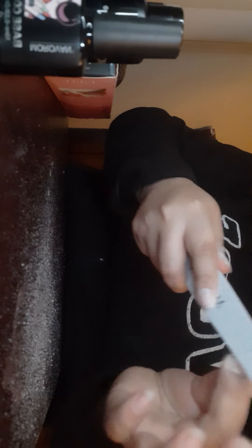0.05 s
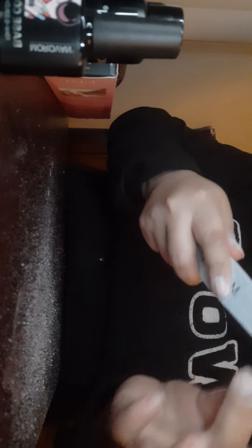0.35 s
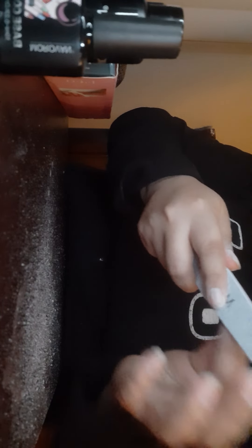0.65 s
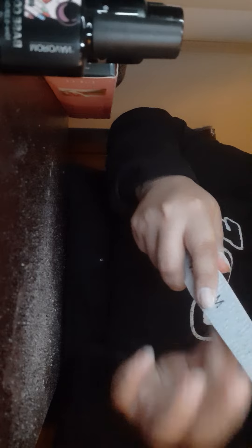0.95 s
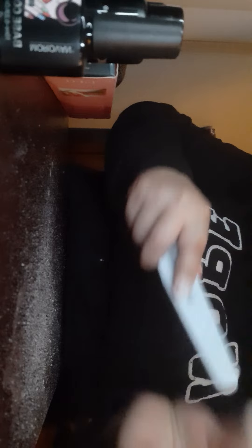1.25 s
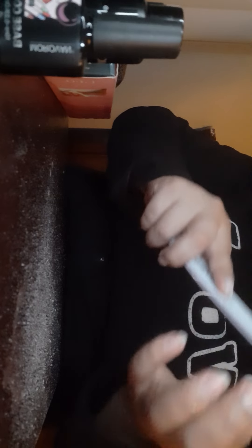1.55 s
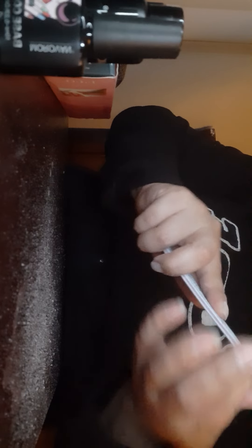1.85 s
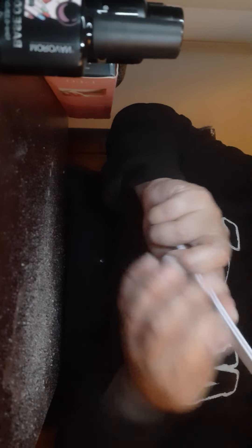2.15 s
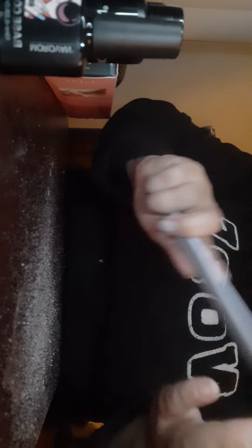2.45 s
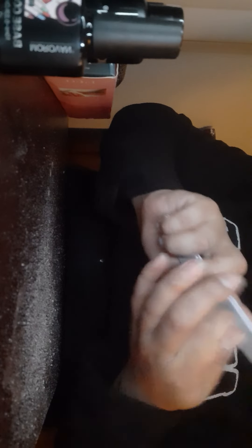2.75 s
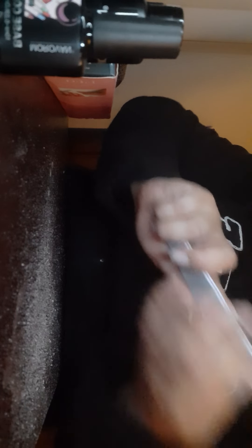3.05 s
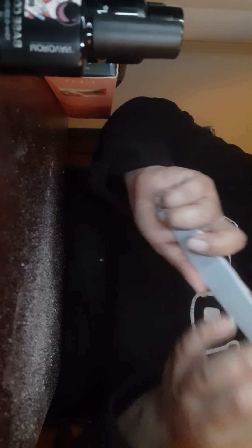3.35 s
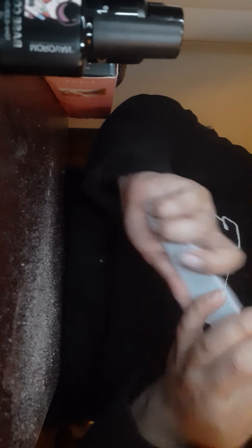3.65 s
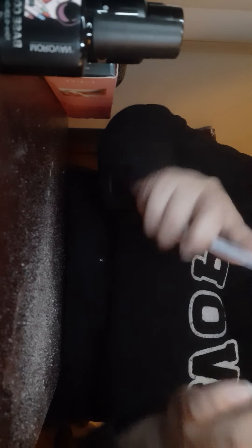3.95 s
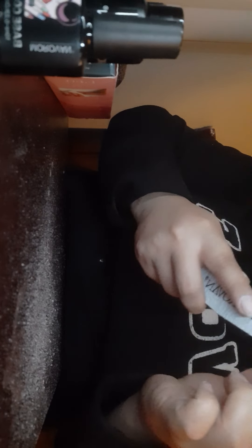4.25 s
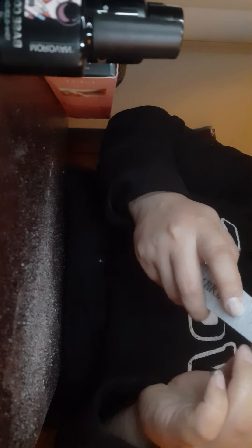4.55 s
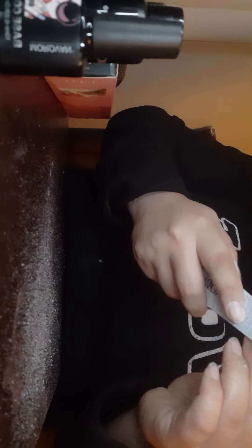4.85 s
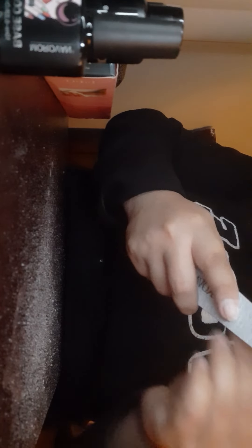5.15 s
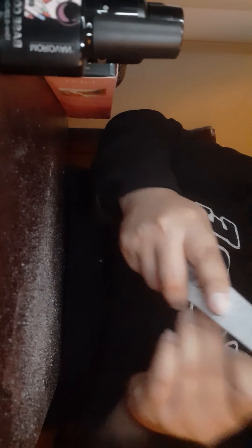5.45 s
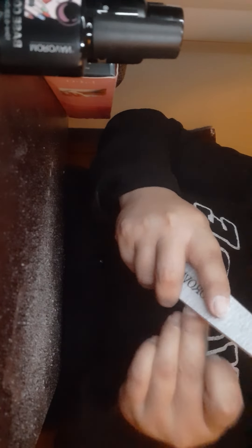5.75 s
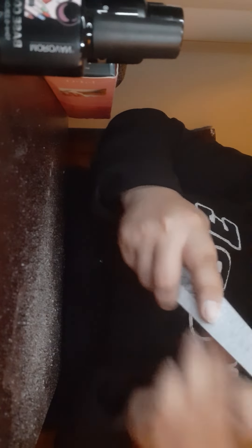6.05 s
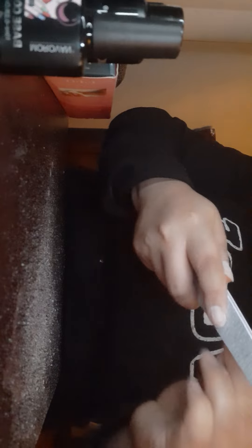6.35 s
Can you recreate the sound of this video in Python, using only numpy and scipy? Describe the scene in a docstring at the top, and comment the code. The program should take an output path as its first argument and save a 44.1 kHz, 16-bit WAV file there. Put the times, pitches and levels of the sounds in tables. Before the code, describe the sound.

Close, gritty rasping of a nail file comes in quick bursts with light ticks and brief pauses, over a low electrical hum.

```python
"""An emery board files fingernails back and forth in short runs, close to a phone in a small room.
Grit catches on the nail's edge thousands of times a second: grains hiss, the nail rasps, the board
rattles. The board ticks and knocks as it meets a nail, and twice a faint tone rings on after a run.
In the pauses come faint squeaks, rustling sleeves and one soft, low bump.
Mains hum, a low drone and steady room noise lie under it all."""
import sys
import numpy as np
from scipy import signal
from scipy.fft import rfft, irfft, next_fast_len
from scipy.io import wavfile
from scipy.ndimage import uniform_filter1d

SR = 44100
rng = np.random.default_rng(int(sys.argv[2]) if len(sys.argv) > 2 else 0)


def wrap_up_sound(samples):
    """Save the sound to the file named by the first command line argument, as 16-bit audio."""
    columns = np.atleast_2d(samples).T
    # keep every value between -1 and 1, then stretch to whole-number steps
    tamed = np.clip(columns, -1, 1)
    steps = np.round(tamed * 32767).astype(np.int16)
    wavfile.write(sys.argv[1], SR, steps)


N = 291501
T = np.arange(N) / SR

# Each pass of the board. Direction is 1 out towards the nail's tip and -1 back.
# start_s, end_s, direction, force_db, board_gain_db
PASSES = [ (0.0, 0.11, 1, -45.5, -12.5), (0.108, 0.145, -1, -42, -12), (0.137, 0.207, 1, -45, -2),
          (0.208, 0.236, -1, -54.5, -14), (.594, 0.761, 1, -60.5, -12), (.753, 0.835, 1, -49.5, -9.5),
          (.833, 0.949, -1, -53.5, -10.5), (0.968, 1.07, 1, -49, -11), (1.06, 1.147, -1, -46, -12.5),
          (1.16, 1.284, 1, -42.5, -13), (1.637, 1.801, 1, -48.5, -16.5), (1.796, 1.878, -1, -47.5, -11),
          (1.895, 2.035, 1, -45, -15), (2.027, 2.119, -1, -48.5, -12.5), (2.123, 2.259, -1, -46.5, -10.5),
          (2.267, 2.425, 1, -41, -10), (2.699, 2.814, -1, -45, -12.5), (2.817, 2.921, 1, -47.5, -11),
          (2.925, 3.029, -1, -42.5, -12.5), (3.031, 3.175, 1, -40.5, -9.5), (3.465, 3.561, -1, -43, -13),
          (3.565, 3.692, 1, -47.5, -7.5), (3.658, 3.77, 1, -46, -10), (4.926, 5.02, 1, -54, -12.5),
          (5.057, 5.173, -1, -53.5, -14), (5.17, 5.284, 1, -50.5, -7.5), (5.302, 5.398, -1, -52.5, -7),
          (5.411, 5.517, 1, -51, -3.5), (5.545, 5.662, -1, -50, -8), (5.668, 5.778, 1, -48.5, -7),
          (5.793, 5.917, -1, -47.5, -9), (5.913, 6.029, 1, -48, -10.5), (6.037, 6.153, -1, -47.5, -9),
          (6.146, 6.267, 1, -51, -7), (6.273, 6.374, -1, -55.5, -5.5), (6.383, 6.504, 1, -53, -5),
          (6.504, 6.605, -1, -50.5, -7.5)]
# How the board is held, until the next grip. The drop and the rise apply only to outward passes.
# start_s, ring_hz, ring_drop_hz, rasp_gain_db, board_rise_db, left_over_right_db
GRIPS = [(0, 2780, 500, -5.5, 0, 5), (.5, 2540, 520, -6, 5.5, 7.5), (1.5, 2550, 350, -8.5, 7, 5),
         (2.08, 2500, 70, -5.5, 20, 1.2), (2.6, 2480, 87, -7, 16, 3), (3.3, 2700, 0, -7.5, 11, 4),
         (4.8, 1980, 52, -5, 27, 5.5), (5.85, 1940, 0, -6, 11.5, 6)]
# The hand bears down for a moment: time_s, extra_db
PRESSES = [(1.235, 4), (2.345, 0.5), (3.048, 5), (3.73, 0.5), (5.485, 1), (5.737, 2)]
# The board meets, snags on or slips off a nail: time_s, tick_gain_db, knock_gain_db
TAPS = [(0.127, -28.5, -70), (1.262, -34.5, -61), (1.643, -69, -53), (2.35, -51, -32), (2.4, -35.5, -60),
        (2.705, -65, -40), (3.147, -37, -40), (3.467, -49, -41), (4.895, -67, -46.5)]
# A faint tone rings on after a run of passes: start_s, level_db
AFTER_RINGS = [(.2, -72.5), (2.47, -86)]
# Faint, high squeaks: start_s, end_s, pitch_hz, level_db
SQUEAKS = [(3.358, 3.445, 6500, -82), (3.833, 3.963, 3300, -75), (4.325, 4.427, 4300, -77)]
# Sleeves and fingers shift: start_s, end_s, level_db
RUSTLES = [(4.327, 4.483, -75), (4.497, 4.62, -73.5), (4.653, 4.754, -68)]
# The tones in the hum: multiple_of_mains, left_db, right_db
HUM_TONES = [(2, -51, -59), (3, -66.5, -67.5), (4, -72.5, -102), (5, -66.5, -77.5), (6, -64.5, -104.5),
             (8, -77.5, -111), (10, -78.5, -92.5)]
# How the low drone swells and sinks: time_s, level_db
DRONE_LEVELS = [(0, -68), (1.1, -70), (1.26, -62), (1.45, -73), (2.1, -62.5), (3.5, -67), (4.25, -77.5),
                (5.7, -77), (6.1, -67), (6.6, -72)]

# Tone curves, which say how strong each sound is from low to high: frequency_hz, gain_db
GRIT_TONE = [(5000, -97), (8700, -12), (10000, -4.5), (11300, 4.5), (13000, 6.5), (14500, 8.5), (16000, -5)]
NAIL_TONE = [(2000, -25.5), (3600, -10.5), (4300, -6), (4650, -3.5), (4950, 0), (5200, 0), (5550, -5),
             (6300, -4.5), (7200, 2), (7850, -4), (8600, -17), (11000, -20)]
BOARD_TONE = [(150, -11.5), (400, -5.5), (620, -2.5), (800, -13), (1120, -3), (1300, -3.5), (1490, 2.5),
              (1780, -7), (2100, -3), (2700, -4.5), (3400, -6), (4500, -10.5), (8000, -35.5)]
KNOCK_TONE = [(60, -18), (170, 12.5), (400, 8), (800, -9), (2200, -5), (4000, -36), (12000, -34)]
CLOTH_TONE = [(200, 27), (700, -23), (1500, 16.5), (3000, -21), (4600, 10), (8600, -14), (12000, 14),
              (13500, 18), (15500, 7)]
RUMBLE_TONE = [(25, -17), (55, -3.5), (100, -8.0), (200, -11.5), (400, -14), (800, -38), (3000, -61)]
DRONE_TONE = [(20, -29.5), (45, -25), (60, 0.5), (68, 3), (76, -3), (95, -8.5), (160, -14.5), (350, -43.5),
              (700, -36.5), (2000, -91)]
AIR_TONE = [(20, -33), (48, -12.5), (68, -6.5), (90, -4), (170, 0.5), (260, -7.5), (450, -13.5), (800, -26),
            (2000, -32.5), (5000, -37), (8600, -46), (13500, -31.5), (16000, -32)]
# How much more the left microphone hears than the right: frequency_hz, left_over_right_db
HANDS_BALANCE = [(100, -17), (400, 10), (1100, 11.5), (1500, 5.5), (2200, 6.5), (3300, 0), (5200, -0.5),
                 (6500, -6.5), (9000, -4.5), (12000, -5), (15000, -3)]
AIR_BALANCE = [(60, 11), (200, 22), (380, 7.5), (700, 4.1), (1300, 4), (2400, 1.4), (15000, 2)]


def filing(rise_db=3.5, lean_in_db=9.5, pause_s=.15, press_width_s=0.021):
    """All the passes. Going out, the nail nears the tip: the board shakes more and mostly rings lower."""
    out, last_end = np.zeros((2, N)), -np.inf
    for start, end, direction, force_db, board_db in PASSES:
        grip = GRIPS[sum(start >= later[0] for later in GRIPS[1:])]
        _, ring_hz, drop_hz, rasp_db, growth_db, left_db = grip
        # pressure rises over every pass, and more after a pause, as the hand leans in
        press_db = lean_in_db if start - last_end > pause_s else rise_db
        board_rise_db, ring_hz = (growth_db, ring_hz - drop_hz) if direction > 0 else (0, ring_hz)
        # shaking the board more than the usual -8.5 dB also rasps the nail more
        nail_db = rasp_db + 0.28 * (board_db + 8.5)
        sound = one_pass(end - start, force_db, press_db, nail_db, board_db, board_rise_db, ring_hz)
        add(out, start, sound * undb([[left_db / 2], [-left_db / 2]]))
        last_end = end
    extra_db = sum(db * np.exp(-((T - time) / press_width_s) ** 2) for time, db in PRESSES)
    return out * undb(extra_db)


def one_pass(length_s, force_db, press_db, nail_db, board_db, board_rise_db, ring_hz, size=12000):
    """The grit bites quickly and lets go slowly, shaking the grains, the nail and the board."""
    age = T[:size]
    progress, speed = hand_move(age, length_s)
    bite_and_release = speed ** np.where(progress < 0, 0.34, 1.5)
    force = bite_and_release * undb(force_db + press_db * progress)
    # after each turn the board skims for a moment before the grit catches
    force *= np.where(age < 0.0052, undb(-9), 1)
    # it sticks and slips, so the force comes in uneven bunches
    force *= flicker(depth_db=1.04, rate_hz=216.7, size=size)
    grit = grit_clicks(speed)
    # the hiss needs speed, so it dies sooner at the turns than the board's rattle
    hiss = ring_body(1.06 * force * speed ** 0.21, speed, grit, GRIT_TONE, beamed=0.94)
    rasp = ring_body(force, speed, grit, NAIL_TONE, beamed=0.63)
    shake = force / (speed + 0.037) ** .18 * undb(board_rise_db * progress)
    shake *= flicker(depth_db=0.5, rate_hz=146.0, size=size)
    rattle = ring_body(shake, speed, grit, BOARD_TONE, beamed=0.23)
    # the free end of the board adds a ring whose pitch depends on the grip
    rattle += 0.96 * signal.lfilter(*signal.iirpeak(ring_hz, Q=9, fs=SR), rattle)
    return hiss + undb(nail_db) * rasp + 0.6 * undb(board_db) * rattle


def grit_clicks(speed, peak_per_s=18000, spread_db=4.0):
    """Grit snaps past the nail's edge in single clicks; a faster hand catches more of them."""
    count = len(speed)
    chance = np.clip(peak_per_s / SR * (.3 + .7 * speed), .01, 1)
    caught = rng.random(count) < chance
    sizes = rng.choice([-1, 1], count) * undb(spread_db * rng.standard_normal(count))
    return unit(caught * sizes / np.sqrt(chance))


def ring_body(force, speed, grit, tone, beamed):
    """Clicks make a body ring. The beamed share of the sound reaches just one microphone or the other."""
    def heard(clicks):
        return bounces(colour(force * clicks, tone), bounce_db=-3)

    shared = heard(grit)
    separate = np.array([heard(grit_clicks(speed))[side] for side in range(2)])
    return np.sqrt(1 - beamed) * shared + np.sqrt(beamed) * separate


def taps(tick_fade_s=0.0016):
    """Each tap is a brief crunch of grit on the nail and a dull push into the board and finger."""
    fades, pushes = np.zeros((2, N))
    for start, tick_db, knock_db in TAPS:
        first = int(start * SR)
        fades[first:] += undb(tick_db) * np.exp(-T[:N - first] / tick_fade_s)
        pushes[first] += undb(knock_db)
    crunch = fades * rng.standard_normal(N)
    ticks = colour(crunch, GRIT_TONE) + .5 * colour(crunch, NAIL_TONE)
    knocks = undb(11) * colour(pushes, KNOCK_TONE)
    return bounces(ticks, bounce_db=11) + knocks


def after_ring(pitch_hz=1106, waver_hz=21.8, fade_s=0.8):
    """One faint, wavering tone dies away when the board lifts."""
    level = sum(undb(db) * (T > start) * die_away(T - start, fade_s) for start, db in AFTER_RINGS)
    cycles = np.cumsum(pitch_hz + waver_hz * wander(rate_hz=60)) / SR
    return level * sine(cycles)


def squeaks():
    """Brief, airy squeaks swell and fade, each a narrow band of noise."""
    out = np.zeros(N)
    for start, end, pitch_hz, db in SQUEAKS:
        band = signal.iirpeak(pitch_hz, Q=6, fs=SR)
        whistle = unit(signal.lfilter(*band, signal.lfilter(*band, rng.standard_normal(N))))
        _, swell = hand_move(T - start, end - start)
        out += undb(db) * swell * whistle
    return bounces(out, bounce_db=-5)


def sleeves():
    """Cloth and skin brush unevenly as the hands change grip."""
    rub = np.zeros(N)
    for start, end, db in RUSTLES:
        _, speed = hand_move(T - start, end - start)
        rub += undb(db) * np.sqrt(speed)
    rub *= flicker(depth_db=3.0, rate_hz=150)
    return np.array([colour(rub * rng.standard_normal(N), CLOTH_TONE) for _ in range(2)])


def bump(start_s=4.352, level_db=-36, rise_s=0.078, fade_s=0.46, pitch_hz=68.5, right_db=-5):
    """A soft shove swells one deep note, with a little rumble around it."""
    age = T - start_s
    swell = np.sqrt(np.clip(age / rise_s, 0, 1)) * die_away(age - rise_s, fade_s)
    rumble = undb(-16) * colour(rng.standard_normal(N), RUMBLE_TONE)
    return undb(level_db) * swell * (sine(pitch_hz * T) + rumble) * undb([[0], [right_db]])


def bounces(sound, bounce_db, fade_s=.0022):
    """Sound reaches two microphones directly, right first, and also bounces off the hands and desk."""
    age = T[:1024]
    pair = []
    for delay_samples in (3, 0):
        echoes = rng.standard_normal(len(age)) * np.exp(-age / fade_s) * (age > .0005)
        response = undb(bounce_db) * echoes / np.linalg.norm(echoes)
        response[delay_samples] += 1
        pair.append(convolve(sound, response / np.linalg.norm(response)))
    return np.array(pair)


def room(pair, echo_db=-10.0, fade_s=0.24):
    """The room adds a short echo; the board's lower tones reach mostly the left microphone."""
    age = T[:SR // 2]
    tails = rng.standard_normal((2, len(age))) * die_away(age, fade_s) * (age > .005)
    echo = np.array([convolve(side, tail / np.linalg.norm(tail)) for side, tail in zip(pair, tails)])
    return balance(pair + undb(echo_db) * echo, HANDS_BALANCE)


def mains_hum(mains_hz=59.97, waver_db=1.0, right_lead_s=0.0011):
    """An appliance hums at multiples of the mains rate; the room's waves reach the right side first."""
    out = np.zeros((2, N))
    clock = np.array([T, T + right_lead_s])
    for multiple, left_db, right_db in HUM_TONES:
        tone = sine(multiple * mains_hz * clock + rng.random())
        out += undb([[left_db], [right_db]]) * tone * undb(waver_db * wander(rate_hz=2.007))
    return out


def room_noise(air_db=-65, split_hz=600):
    """Steady air noise and a low drone. Both microphones share the bass; each has its own hiss."""
    low, high = (signal.butter(2, split_hz, kind, fs=SR, output="sos") for kind in ("low", "high"))
    bass = signal.sosfilt(low, rng.standard_normal(N))
    hiss = signal.sosfilt(high, rng.standard_normal((2, N)))
    air = undb(air_db) * np.array([colour(bass + side, AIR_TONE) for side in hiss])
    drone_db = np.interp(T, *np.transpose(DRONE_LEVELS))
    drone = undb(drone_db) * colour(rng.standard_normal(N), DRONE_TONE)
    return balance(air + drone, AIR_BALANCE)


def hand_move(age, length_s):
    """How far a movement has got, from -.5 to .5, and its speed, which is zero at both ends."""
    progress = np.clip(age / length_s, 0, 1) - .5
    return progress, np.maximum(1 - (2 * progress) ** 2, 0) ** 1.326


def wander(rate_hz, size=N):
    """A smooth random drift, about one unit either way."""
    span = max(int(SR / rate_hz), 1)
    steps = np.repeat(rng.standard_normal(size // span + 1), span)[:size]
    return unit(uniform_filter1d(steps, span))


def flicker(depth_db, rate_hz, size=N):
    """A gain that wobbles at random but keeps the average power."""
    return unit(undb(depth_db * wander(rate_hz, size)))


def die_away(age, fade_s):
    """A gain that holds at one until age zero, then falls 60 dB every fade_s."""
    return np.exp(-np.log(1000) * np.maximum(age, 0) / fade_s)


def sine(cycles):
    """A pure tone with an average power of one."""
    return np.sqrt(2) * np.sin(2 * np.pi * cycles)


def colour(sound, tone, size=8192):
    """Ring a sound through a body with this tone curve; white noise keeps its level."""
    cepstrum = irfft(np.log(unit(curve_gains(tone, size))))
    # fold the second half onto the first, so the body rings only after it is struck
    cepstrum[1:size // 2] *= 2
    cepstrum[size // 2 + 1:] = 0
    return convolve(sound, irfft(np.exp(rfft(cepstrum))))


def balance(pair, curve):
    """Share the power between the two microphones, frequency by frequency."""
    size = next_fast_len(N + SR)
    ratio = curve_gains(curve, size)
    gains = np.array([ratio, np.ones_like(ratio)]) * np.sqrt(2 / (1 + ratio ** 2))
    return irfft(rfft(pair, size) * gains, size)[:, :N]


def curve_gains(curve, size):
    """Join a curve's points to get a gain for each frequency in a block of this size."""
    hz, db = np.transpose(curve)
    frequencies = np.fft.rfftfreq(size, 1 / SR)
    return undb(np.interp(np.log(frequencies + 1), np.log(hz), db))


def convolve(sound, response):
    """Give a sound an echo or ring, keeping its length."""
    return signal.fftconvolve(sound, response)[:len(sound)]


def add(track, start_s, sound):
    """Mix a stereo sound in at a given time."""
    first = max(int(start_s * SR), 0)
    track[:, first:first + sound.shape[1]] += sound[:, :N - first]


def undb(db):
    """Turn decibels into a gain."""
    return 10 ** (np.asarray(db) / 20)


def unit(x):
    """Scale to an average power of one."""
    return x / np.sqrt(np.mean(x ** 2))


def scene():
    """The hands at work in the room, over its background."""
    hands = filing() + taps() + sleeves() + squeaks() + after_ring()
    return room(hands) + bump() + mains_hum() + room_noise()


def record(dry):
    """The phone cuts off the highest treble."""
    top_hz = 15800
    return signal.sosfilt(signal.ellip(8, .1, 70, top_hz, fs=SR, output="sos"), dry)


dry = scene()
out = record(dry)
wrap_up_sound(out)
```